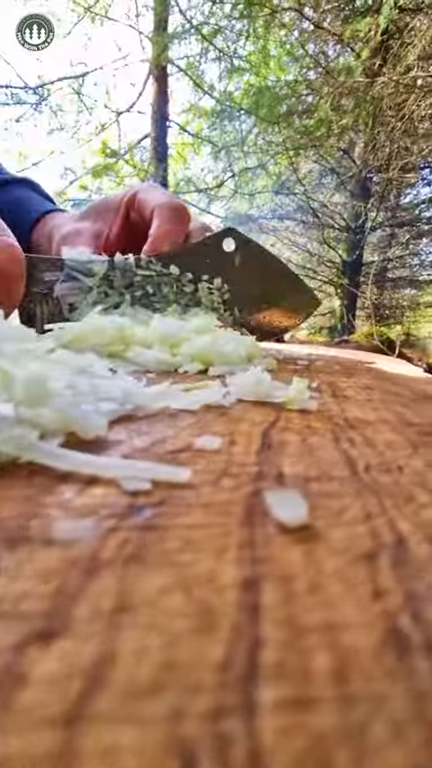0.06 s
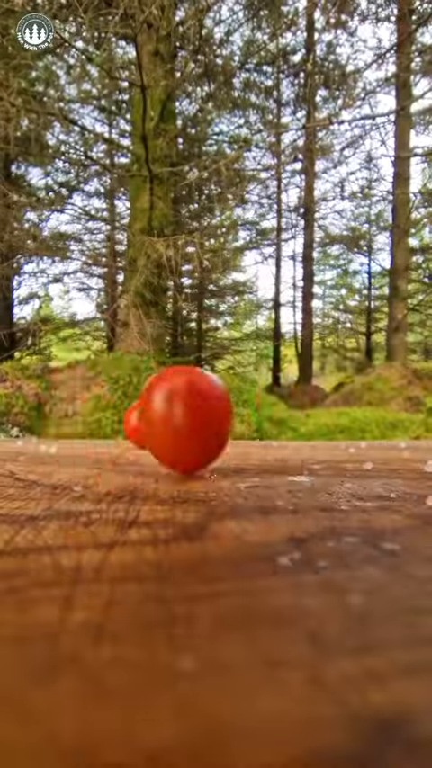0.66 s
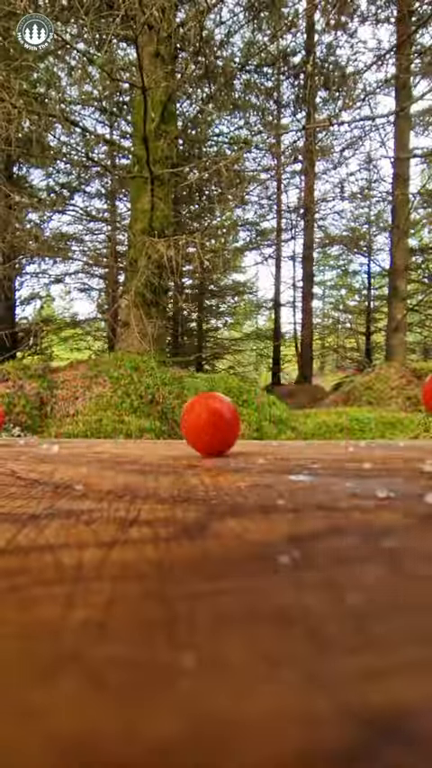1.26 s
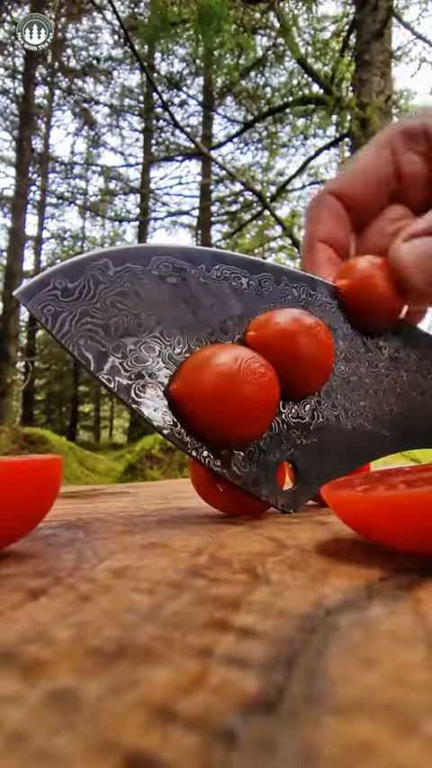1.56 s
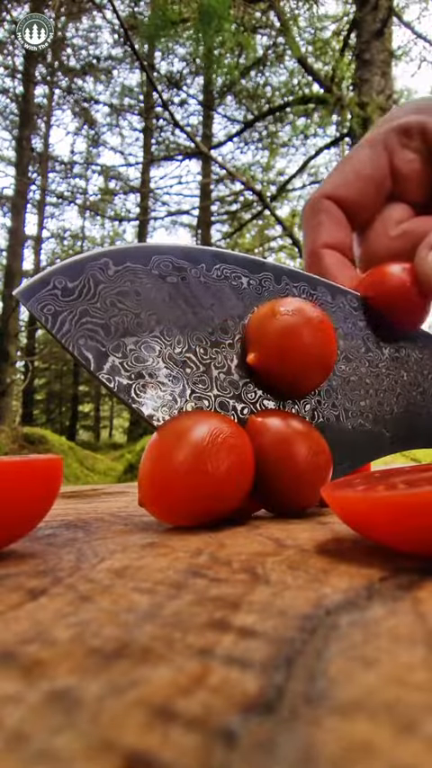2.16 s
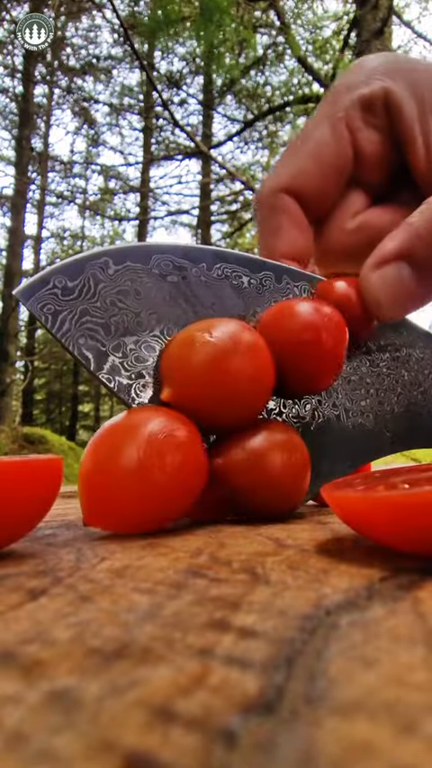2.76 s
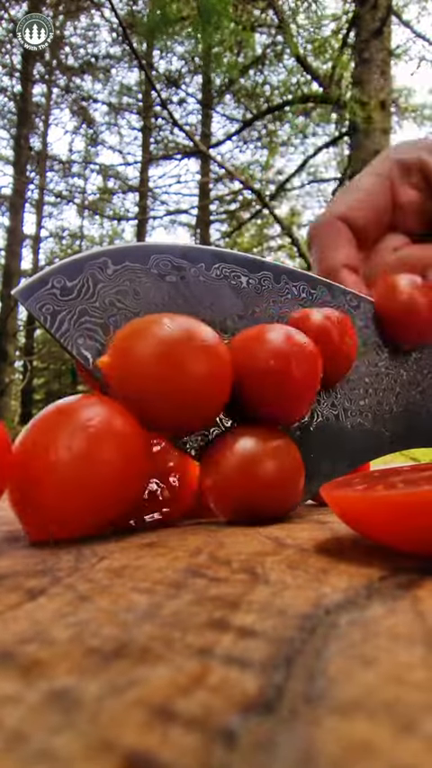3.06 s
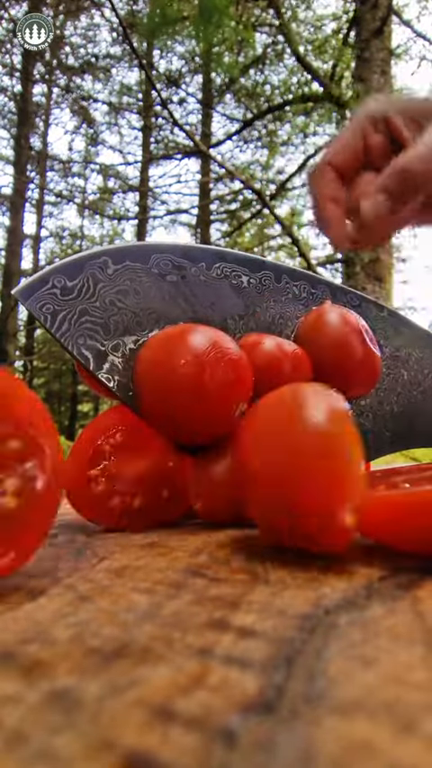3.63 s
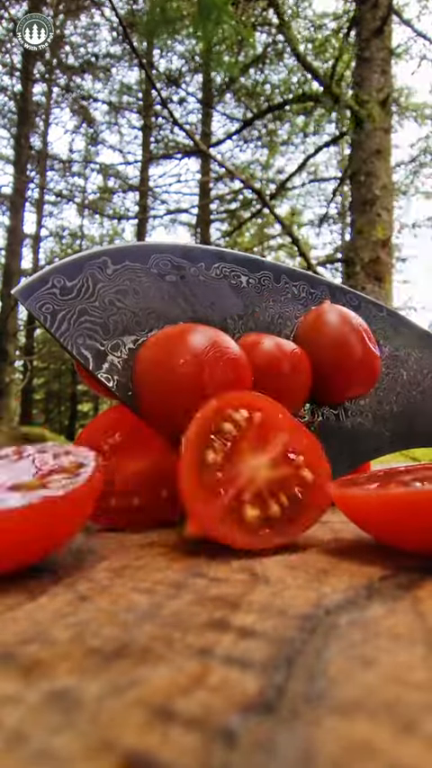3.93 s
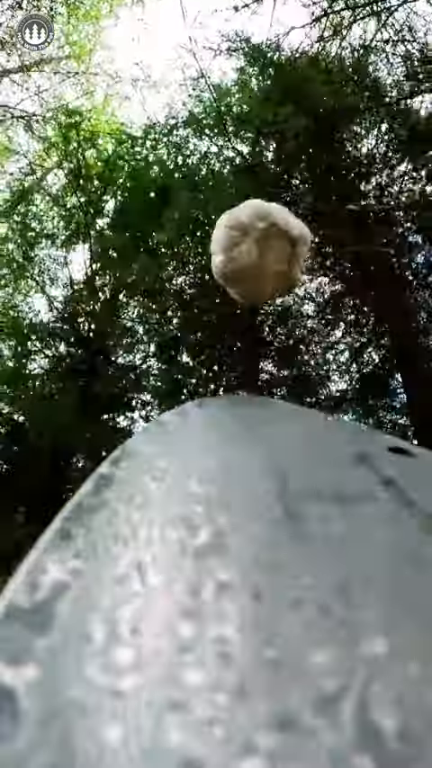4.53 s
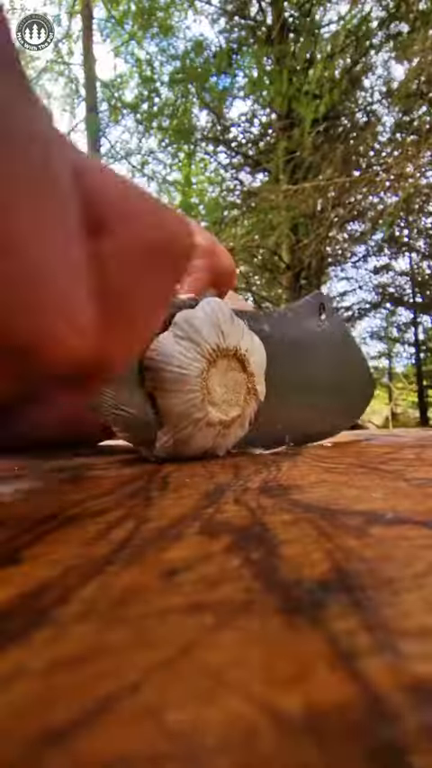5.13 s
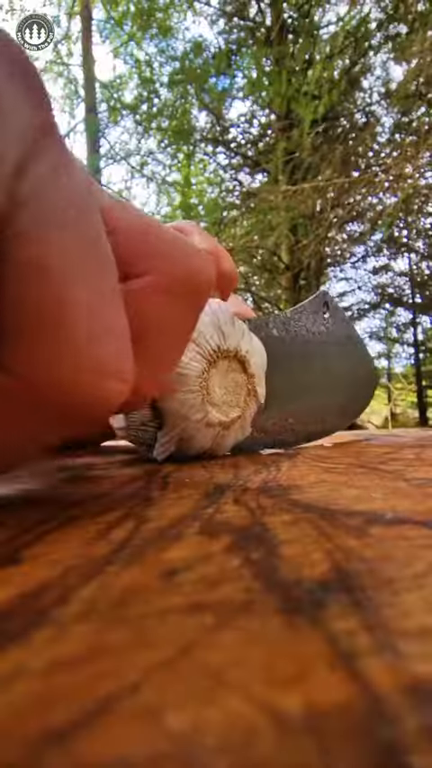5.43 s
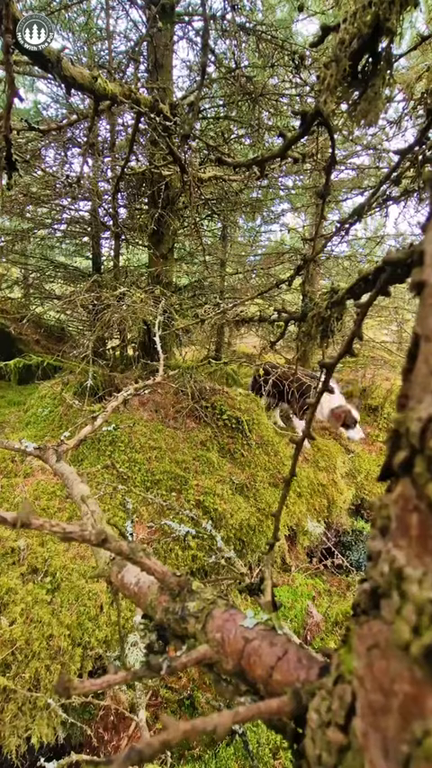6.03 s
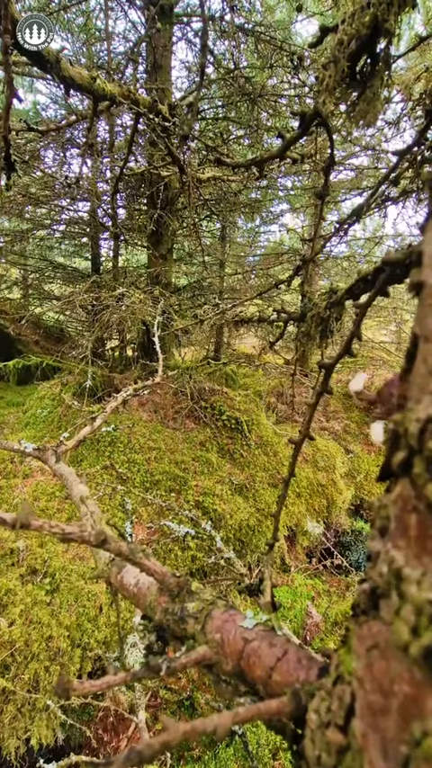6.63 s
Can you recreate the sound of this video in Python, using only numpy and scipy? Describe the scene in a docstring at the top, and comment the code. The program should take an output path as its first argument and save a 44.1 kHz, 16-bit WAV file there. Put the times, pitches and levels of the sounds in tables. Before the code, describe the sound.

An onion crunch, small tomatoes thudding onto a wooden board, soft wet slicing, then a cleaver knocking and crunching through garlic, with faint birdsong.

```python
"""A cleaver crunches through onion on a thick wooden board, close to a pair of microphones in a forest.
Small tomatoes drop and roll, rocking the board and ringing its modes, then rub wetly along the blade as
they are sliced. A garlic bulb is tossed, lands on the steel and is cut through, cloves cracking; a few
light knocks follow. Songbirds sing in the trees, echoed by the trunks, over faint hiss and low rumble."""
import sys
import numpy as np
from scipy import signal
from scipy.fft import rfft, irfft, next_fast_len
from scipy.io import wavfile
from scipy.ndimage import uniform_filter1d, map_coordinates

SR = 44100
rng = np.random.default_rng(int(sys.argv[2]) if len(sys.argv) > 2 else 0)


def materialize(psi):
    """Save the field psi as 16-bit PCM at rate SR to the path in sys.argv[1].

    A 1-D psi becomes a single channel; in a 2-D psi each row is a channel.
    """
    bounded = np.clip(np.atleast_2d(psi).T, -1, 1)
    quanta = np.round(bounded * 32767).astype(np.int16)
    wavfile.write(sys.argv[1], SR, quanta)


N = 299422
TIME = np.arange(N) / SR
ROLL_START_S, ROLL_END_S = 0.54, 1.518  # tomatoes rolling over the board

# The board rocking on its support, and the blade ringing.
# Each row: mode in Hz, level in dB, seconds to fall 60 dB.
ROCKING_MODES = [(73, -7.5, 0.065), (112, -1, 0.09), (169, -14, 0.18)]
BLADE_MODES = [(1143, -7, 0.035), (1488, -7, 0.018), (2560, 2, 0.017), (4230, -2, 0.026), (5430, -6, 0.04)]
# Spectra of snapping skin, a dull shudder and a low rumble. Each row: frequency in Hz, level in dB.
SNAP_SPECTRUM = [(600, -10.5), (2000, 2), (4000, 2.5), (7500, -2), (16000, -13)]
SHUDDER_SPECTRUM = [(30, -42), (70, -1.5), (300, 0), (6000, -60)]
RUMBLE_SPECTRUM = [(20, -18), (70, 4.5), (200, -6.5), (3000, -80)]
# Strokes through tomato. Each row: start and meeting with the board in seconds, rub and knock in dB.
TOMATO_SLICES = [(1.537, 1.7595, -41, -26), (2.044, 2.4496, -45, -24.5), (2.622, 2.8193, -43, -16.5),
                 (3.071, 3.259, -44, -32)]


def amp(db):
    return 10 ** (np.asarray(db) / 20)


def unit(x):
    return x / np.sqrt(np.mean(x ** 2) + 1e-20)


def add(mix, s, sound):
    """Mixes a sound into both channels, s seconds in."""
    part = mix[:, max(round(s * SR), 0):][:, :sound.shape[1]]
    part += sound[:, :part.shape[1]]


def place(left_db):
    """Gains of the two microphones, the left one left_db above the right."""
    return 2 * np.array([[amp(left_db)], [1]]) / (1 + amp(left_db))


def colour(x, spectrum):
    """Filters x by rows of Hz and dB, and brings it to rms 1."""
    hz, db = np.transpose(spectrum)
    bins_hz = np.fft.rfftfreq(x.shape[-1], 1 / SR)
    gain = amp(np.interp(np.log(bins_hz + 1), np.log(hz + 1), db))
    return unit(irfft(rfft(x) * gain, x.shape[-1]))


def noise(spectrum, alike=0.98, size=N):
    """Coloured noise; alike is the share of its power common to both microphones."""
    white = rng.standard_normal((3, next_fast_len(size)))
    return colour(np.sqrt(alike) * white[0] + np.sqrt(1 - alike) * white[1:], spectrum)[:, :size]


def flutter(depth_db, per_s):
    """A gain that wanders at random."""
    knots = rng.standard_normal(8000)
    return amp(depth_db * np.interp(TIME * per_s, np.arange(len(knots)), knots))


def patchy(x, depth_db, per_s):
    """Resonances come and go: random patches of gain over time and pitch, wider in the treble."""
    lowest_patch_hz = 29.9
    hz, t, spectra = signal.stft(x, SR, nperseg=256)
    knots = rng.standard_normal((64, 1000))
    grid = np.meshgrid(np.sqrt(hz / lowest_patch_hz), t * per_s, indexing="ij")
    gain = amp(depth_db * map_coordinates(knots, grid, order=1, mode="wrap"))
    return unit(signal.istft(spectra * gain, SR, nperseg=256)[1][:, :N])


def burst(t, rise, fall):
    """An envelope that swells up to t = 0 and dies away."""
    return np.exp(np.minimum(t, 0) / rise - np.maximum(t, 0) / fall)


def stroke(start, end, attack_s=0.049, release_s=0.052, swell_db=0):
    """An envelope that sets in, swells from start to end, and is released."""
    held = amp(-swell_db * np.clip((end - TIME) / (end - start), 0, 1))
    return held * np.exp(np.minimum(TIME - start, 0) / attack_s - np.maximum(TIME - end, 0) / release_s)


def ring(modes, t, detune=0, phase=0):
    """Decaying modes, struck at t = 0; detune shifts them a little for each strike point."""
    hz, db, t60 = np.transpose(modes)[:, :, None]
    hz = hz * (1 + detune * rng.standard_normal(hz.shape))
    decay = amp(db - 60 * np.maximum(t, 0) / t60)
    phasor = (decay * np.exp(2j * np.pi * hz * t)).sum(0)
    return -(phasor * np.exp(1j * phase)).imag


def excite(x, response):
    """Plays x through an impulse response."""
    return signal.oaconvolve(x, np.atleast_2d(response), axes=1)[:, :N]


def background():
    """Faint air and forest hiss, the board rumbling as tomatoes roll and are sliced, and a late hush."""
    # The distant forest. Each row: frequency in Hz, level in dB.
    forest_spectrum = [(450, -1.5), (1700, -19), (8000, -13), (9500, -25.5), (16000, -30.5)]
    slicing_rumble = amp(-52.5) * stroke(1.6, 4.09, swell_db=2)  # the board being worked
    rolling_rumble = amp(-48) * stroke(ROLL_START_S, ROLL_END_S)
    level = amp(-66.5) + slicing_rumble + rolling_rumble
    rumble = level * noise(RUMBLE_SPECTRUM) * flutter(depth_db=6.5, per_s=22)
    hush = amp(-58) * stroke(5.78, TIME[-1]) * noise(SHUDDER_SPECTRUM)
    forest = amp(-67.5) * patchy(noise(forest_spectrum, alike=0.47), depth_db=2.5, per_s=10)
    return place(-2) * (rumble + hush + forest)


def fractures(per_s, spread_db, alike):
    """Crisp cells bursting: dense clicks, a few of them large."""
    size = amp(spread_db * np.minimum(rng.exponential(1, (3, N)), 4))
    clicks = size * rng.standard_normal((3, N)) * (rng.random((3, N)) < per_s / SR)
    return unit(np.sqrt(alike) * clicks[0] + np.sqrt(1 - alike) * clicks[1:])


def onion():
    """Close on the right, layers of onion crack in quick succession and make the blade ring."""
    # Layers giving way. Each row: time in seconds, level in dB, rise and fall in seconds.
    chops = [(0.183, -25.5, 0.0074, 0.0045), (0.191, -21, 0.0023, 0.0047), (0.197, -25, 0.0021, 0.0076),
             (0.286, -29, 0.0054, 0.011)]
    # Their crunch. Each row: frequency in Hz, level in dB.
    crunch_spectrum = [(50, -1), (200, 11.5), (700, -2), (1400, -1.5), (2600, 0.5), (8000, -10.5),
                       (16000, -34)]
    force = sum(amp(db) * burst(TIME - s, rise, fall) for s, db, rise, fall in chops)
    crunch = force * colour(fractures(per_s=8300, spread_db=2.0, alike=0.67), crunch_spectrum)
    steel = ring(BLADE_MODES, np.arange(SR // 10) / SR)
    ringing = excite(crunch, steel / np.linalg.norm(steel))
    return place(-10.5) * (amp(-2) * crunch + amp(-13) * ringing)


def on_steel(x, decay_s=0.0072):
    """Adds the short ring of the blade's many high modes, which gives rubbing its rasp."""
    t = np.arange(SR // 20) / SR
    modes = rng.standard_normal(len(t)) * np.exp(-t / decay_s)
    return x + 0.55 * unit(excite(x, modes))


def tomatoes():
    """Skins hiss and crackle over the wood; then wet flesh rubs along the blade and skin rasps on it."""
    # Rubbing flesh and hissing skin. Each row: frequency in Hz, level in dB.
    flesh_spectrum = [(250, -11), (500, 8.5), (850, -0.5), (8000, -71.5)]
    skin_spectrum = [(1200, -8), (2600, -13), (4200, -9), (7800, -3), (9500, -11.5), (16000, -10)]
    rolling = amp(-52) * stroke(ROLL_START_S, ROLL_END_S)
    rubbing = skin = 0
    for start, end, db, _ in TOMATO_SLICES:  # the blade presses harder as it sinks
        rubbing += amp(db) * stroke(start, end, attack_s=0.038, release_s=0.013, swell_db=10.5)
        skin += amp(db - 6.5) * stroke(start, end, attack_s=0.038, release_s=0.086, swell_db=4.5)
    flesh = rubbing * patchy(noise(flesh_spectrum, alike=0.63), depth_db=4, per_s=25)
    rasp = on_steel(fractures(per_s=30000, spread_db=0.5, alike=0.25))
    hiss = patchy(colour(rasp, skin_spectrum), depth_db=3, per_s=18)
    crackle = colour(fractures(per_s=330, spread_db=2.0, alike=0.67), SNAP_SPECTRUM)
    return place(-16.5) * (flesh + skin * hiss) + place(-6) * rolling * (hiss + amp(-8) * crackle)


def blow(mix, s, db, hz, thump_db, plate_db, clack_db, snap_db, steel_db=-np.inf, cycles=0.93):
    """A push that rocks, rings and rattles the board, snaps skin and may ring the blade (dB re push)."""
    # Where the microphones stand at each step. Each row: start in seconds, left over right in dB.
    stands = [(0, -17.5), (1.6, -20), (4, 0), (5.5, -14.5)]
    # The board ringing as a plate. Each row: mode in Hz, level in dB, seconds to fall 60 dB.
    plate_modes = [(230, -3.5, 0.08), (340, 2.5, 0.1), (419.4, -11, 0.12), (638, -15, 0.092),
                   (790, -14, 0.05)]
    # The clack of contact. Each row: frequency in Hz, level in dB.
    clack_spectrum = [(250, -34.5), (600, 9), (1100, 2.5), (1600, -8.5), (3000, -14), (6000, -27.5),
                      (16000, -64.5)]
    lead_s, rattle_s, skew_rad_per_db = 0.01, 0.018, 0.04
    sag_s = 0.005  # low notes cross the board late: the push falls to half its pitch in this time
    t = np.arange(SR // 3) / SR - lead_s
    left_db = [side_db for start, side_db in stands if start < s][-1]
    # The further to one side a blow lands, the more the microphones differ in phase.
    phase = np.array([[skew_rad_per_db * left_db], [0]])
    sag = np.maximum(t, 0) / sag_s
    turns = hz * (np.minimum(t, 0) + sag_s * np.log1p(sag))
    push = np.cos(2 * np.pi * turns + phase) * burst(turns, rise=0.57, fall=cycles) / np.sqrt(1 + sag)
    contact = np.clip(1 + t * hz, 0, 1) ** 2  # soft things load the board slowly
    thump = amp(thump_db) * ring(ROCKING_MODES, t, detune=0.026, phase=phase / 2) * contact
    plate = amp(plate_db) * ring(plate_modes, t, detune=0.03, phase=phase) * contact
    steel = amp(steel_db) * ring(BLADE_MODES, t) * contact
    shudder = amp(thump_db - 17) * noise(SHUDDER_SPECTRUM, alike=0.29, size=len(t))
    shudder *= burst(t, rise=0.005, fall=0.025)
    slaps = [(0, 0.98)] + [(delay, amp(-12)) for delay in rattle_s * rng.random(size=2)]
    rattle = sum(size * burst(t - delay, rise=0.0019, fall=0.0037) for delay, size in slaps)
    clack = amp(clack_db) * noise(clack_spectrum, alike=0.73, size=len(t)) * rattle
    snap = amp(snap_db) * noise(SNAP_SPECTRUM, alike=0.95, size=len(t))
    snap *= burst(t + 0.0015, rise=0.0007, fall=0.0031)
    near = place(left_db) * (push + plate + steel + clack + snap + shudder)
    bass = place(0.23 * left_db) * thump  # reaches both microphones
    add(mix, s - lead_s, amp(db) * (near + bass))


def blows():
    """Everything that strikes the board or the blade, each kind with its own touch."""
    # Tomatoes dropping and bouncing.
    # Each row: time in seconds, strength in dB, contact pitch in Hz, crispness and plate ring in dB.
    drops = [(0.643, -11.5, 280, 0, -14), (0.77, -12.5, 420, 2, -3), (0.7843, -8, 297, -4.5, -13.5),
             (0.9013, -12, 270, 0.5, -12.5), (0.9131, -19, 332, -1, 1), (1.031, -13.5, 570, 0.5, -3.5),
             (1.2291, -20, 242, -8.5, -10.5), (1.344, -27.5, 298, -13, -3.5), (1.3946, -14, 530, 4, -3),
             (1.4003, -17.5, 376, -8, 4)]
    # Cut tomato, then garlic, toppling. Each row: time in seconds, strength in dB, contact pitch in Hz.
    topples = [(1.894, -29.5, 533), (2.98, -20.5, 533), (3.5511, -31.5, 497), (5.836, -29, 320),
               (5.899, -26.5, 388), (5.977, -27.5, 342)]
    # The bulb landing and bouncing on the blade. Each row: time in seconds, strength and crispness in dB.
    landings = [(4.7878, -9.5, 0.5), (4.877, -19, -18)]
    # The cleaver jolting down through garlic. Each row: time in seconds, strength in dB.
    jolts = [(5.0065, -11), (5.07, -10), (5.759, -27)]
    out = np.zeros((2, N))
    for s, db, hz, crisp_db, ring_db in drops:
        clack_db = crisp_db - 11.5 + 20 * np.log10(hz / 400)
        blow(out, s, db, hz, thump_db=-1, plate_db=ring_db, clack_db=clack_db, snap_db=crisp_db - 19.5)
    for _, s, _, db in TOMATO_SLICES:
        blow(out, s, db, hz=660, thump_db=-17.5, plate_db=-21, clack_db=-15, snap_db=-11, steel_db=-24.5)
    for s, db, hz in topples:
        blow(out, s, db, hz, thump_db=-10.5, plate_db=-12.5, clack_db=-17.5, snap_db=-46)
    for s, db, crisp_db in landings:
        blow(out, s, db, hz=482, thump_db=crisp_db / 2 - 11, plate_db=-15, clack_db=-6.5,
             snap_db=crisp_db - 14, steel_db=crisp_db - 9, cycles=4.6)
    for s, db in jolts:
        blow(out, s, db, hz=485, thump_db=-10, plate_db=-11, clack_db=-9.5, snap_db=-14, steel_db=-10)
    for s in (6.0776, 6.2574, 6.4378, 6.595):  # light knocks at the end
        blow(out, s, db=-32, hz=480, thump_db=-12.5, plate_db=-14, clack_db=-11.5, snap_db=-25.5)
    return out


def ticks():
    """Tiny snaps of wet skin and juice."""
    # Each row: time in seconds, relative level in dB.
    snaps = [(1.0, -24.5), (1.018, -22), (1.147, -34.5), (1.206, -34.5), (1.453, -36), (1.546, -34),
             (3.021, -38.5), (4.163, -28), (4.717, -33.5), (6.68, -44.5)]
    out, t = np.zeros((2, N)), np.arange(SR // 30) / SR
    for s, db in snaps:
        add(out, s, amp(db - 9) * noise(SNAP_SPECTRUM, size=len(t)) * np.exp(-t / 0.0032))
    return out


def chirp(length_s, first_hz, middle_hz, last_hz, db, buzz):
    """A whistle that bends through three pitches, with a fast waver of pitch and strength."""
    progress = np.linspace(0, 1, max(round(length_s * SR), 64))
    hz = np.polyval(np.polyfit([0, .5, 1], [first_hz, middle_hz, last_hz], 2), progress)
    waver = unit(uniform_filter1d(rng.standard_normal(len(progress)), size=50))
    tone = np.sin(2 * np.pi * np.cumsum(hz * (1 + buzz * waver)) / SR)
    return amp(db + waver) * np.sin(np.pi * progress) * tone[None]


def birds():
    """Songbirds, their notes scattered back by the trunks; the far ones are mostly echo."""
    # Far notes, and one syllable of a nearer trill (a fall and two upward flicks). Each row: start and
    # length in seconds, first, middle and last pitch in Hz, relative dB, buzz as a share of the pitch.
    far_notes = [ (2, 0.14, 3000, 3635, 3920, -46.5, 0.11), (2.086, 0.18, 2380, 2270, 2150, -52, 0.084),
                 (3.406, 0.068, 6430, 6110, 5170, -60.5, 0.012),
                 (3.57, 0.13, 6970, 5580, 5060, -59.5, 0.016), (3.786, 0.14, 4380, 4340, 3190, -60.5, 0.02),
                 (4.032, 0.072, 4700, 3660, 4260, -57, 0.02), (4.213, 0.1, 4510, 4910, 4140, -46, 0.005),
                 (4.842, 0.083, 4040, 3743, 3580, -37, 0.079),
                 (6.732, 0.091, 3800, 3530, 3450, -59.5, 0.064)]
    syllable = [(0, 0.047, 7700, 6570, 5830, -9.5, 0.056), (0.032, 0.024, 3095, 5160, 5020, 4, 0.013),
                (0.058, .014, 3500, 5300, 6600, 5.5, .012)]
    trill_start_s, trill_period_s = 4.293, 0.1287
    far, near = np.zeros((2, 2, N))
    for s, *note in far_notes:
        add(far, s, chirp(*note))
    for k in range(4):
        gain = amp(-38.5 - 13 / 2 ** k)  # the trill starts soft
        for s, *note in syllable:
            add(near, trill_start_s + k * trill_period_s + s, gain * chirp(*note))
    t = np.arange(SR // 2) / SR
    trunks = rng.standard_normal((2, len(t))) * np.exp(-t / 0.072)
    echo = excite(far + 0.47 * near, trunks / np.linalg.norm(trunks[0]))
    return near + amp(-3) * far + echo


def squeaks(glide_hz=65):
    """Short, slightly rising stick-slip tones of steel in tomato skin and garlic."""
    # Each row: start and length in seconds, middle pitch in Hz, level in dB.
    slips = [(2.745, 0.075, 4270, -52), (5.066, 0.024, 589, -19), (5.735, 0.084, 5530, -40)]
    out = np.zeros((2, N))
    for s, length_s, hz, db in slips:
        add(out, s, chirp(length_s, hz - glide_hz, hz, hz + glide_hz, db, buzz=0.0078))
    return place(-4) * out


def toss(start_s=4.155, end_s=4.85):
    """The blade scrapes and fans the air as it flicks the garlic up; air rushes on while it flies."""
    # Air and steel sweeping past. Each row: frequency in Hz, level in dB.
    rush_spectrum = [(100, -6.5), (300, 8.5), (1100, -10), (5000, -10.5), (10000, -50)]
    scrape = amp(-39.5) * burst(TIME - start_s, rise=0.0097, fall=0.017)
    flight = amp(-57) * stroke(start_s, end_s, attack_s=0.011, release_s=0.025)
    wind = amp(-39.5) * burst(TIME - start_s, rise=0.086, fall=0.043)
    rush = (scrape + flight) * noise(rush_spectrum)
    return rush + amp(-13) * scrape * noise(SNAP_SPECTRUM) + wind * noise(RUMBLE_SPECTRUM)


def garlic():
    """The edge tears papery skin and cloves in clumps, makes the blade ring and shakes the board."""
    # The garlic's crunch and the loaded board's groan. Each row: frequency in Hz, level in dB.
    crunch_spectrum = [(300, -8.5), (1150, -8.5), (2000, -9.5), (5500, -6.5), (8200, -2.5), (9600, -14.5),
                       (13100, -3.5), (16000, -14.5)]
    groan_spectrum = [(55, -25.5), (101, 13.5), (165, -13.5), (255, 6), (3000, -46)]
    # Strokes of the cleaver. Each row: start and hardest push in seconds, crunch in dB,
    # release in seconds, left over right in dB.
    cuts = [(4.93, 5.199, -31.5, 0.0087, -6), (5.4, 5.616, -30, 0.099, -10.5)]
    # Cloves giving way. Each row: time in seconds, crunch in dB, width in seconds, groan in dB.
    clove_cracks = [(5.059, -22, 0.016, -22.5), (5.105, -25, 0.0057, -40.5), (5.581, -28.5, 0.014, -65.5),
                    (5.769, -36.5, 0.033, -36.5), (5.981, -44, 0.011, -49.5)]
    # The board rocks as the cleaver stalls and is pushed on. Each row: time in seconds, level in dB.
    nudges = [(5.191, -27), (5.393, -27.5)]
    attack_s, load_s, unload_s = 0.0082, 0.048, 0.017  # the board loads slowly, then a crack frees it
    out, t = np.zeros((2, N)), np.arange(SR // 5) / SR
    rasp = on_steel(fractures(per_s=3800, spread_db=4.4, alike=0.4))
    crunch = patchy(colour(rasp, crunch_spectrum), depth_db=4, per_s=60)
    ringing = unit(excite(crunch, ring(BLADE_MODES, t)))
    crunch = unit(crunch + amp(-13) * ringing)
    groan = noise(groan_spectrum)
    for start, end, db, release_s, left_db in cuts:
        cracks = [row for row in clove_cracks if start < row[0] < end + 4 * release_s]
        tearing = amp(db) * stroke(start, end, attack_s, release_s, swell_db=10.5)
        cracking = sum(amp(crack_db) * burst(TIME - s, width, width) for s, crack_db, width, _ in cracks)
        load = sum(amp(groan_db) * burst(TIME - s, load_s, unload_s) for s, _, _, groan_db in cracks)
        pressure = amp(-48) * stroke(start, end, attack_s, release_s)
        out += place(left_db) * ((tearing + cracking) * crunch + (pressure + load) * groan)
    for s, db in nudges:
        rocking = ring(ROCKING_MODES, t) * np.minimum(t / unload_s, 1)
        add(out, s, amp(db) * rocking[None])
    return out


def scene():
    """The board close up and mostly to the right, with the forest behind it."""
    cooking = blows() + ticks() + onion() + garlic() + squeaks() + toss() + tomatoes()
    return cooking + birds() + background()


def record(dry):
    """The microphones lose the deepest bass, flatten peaks past full scale and cut the highest treble."""
    low_cut_hz, high_cut_hz = 32, 16200
    heard = signal.sosfilt(signal.butter(2, low_cut_hz, "high", fs=SR, output="sos"), dry)
    band_limit = signal.firwin(511, high_cut_hz, window=("kaiser", 9), fs=SR)
    return signal.oaconvolve(np.clip(heard, -1, 1), band_limit[None], "same")


dry = scene()
out = record(dry)
materialize(out)
```